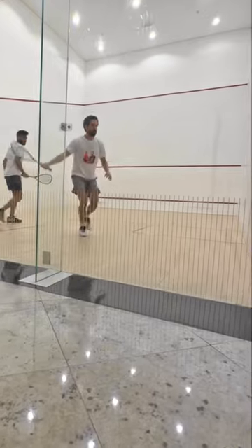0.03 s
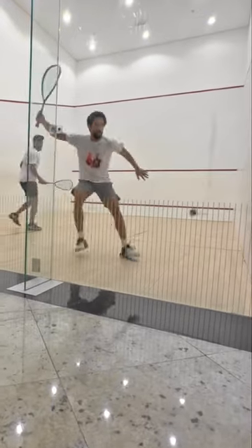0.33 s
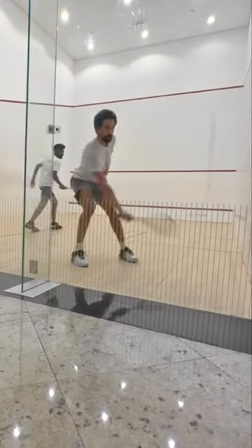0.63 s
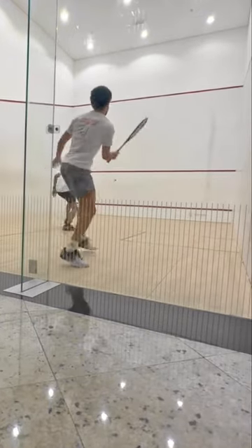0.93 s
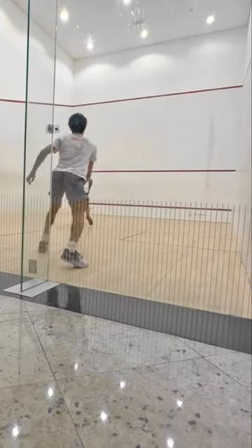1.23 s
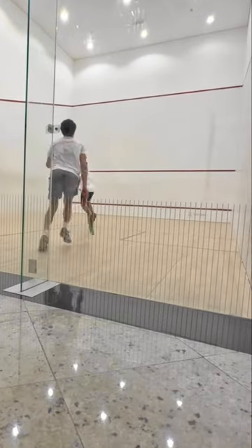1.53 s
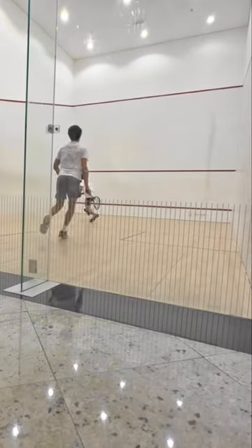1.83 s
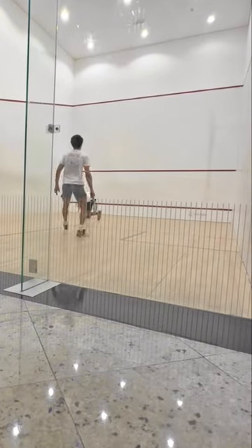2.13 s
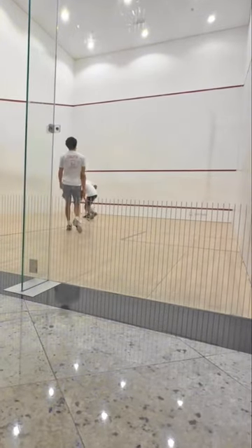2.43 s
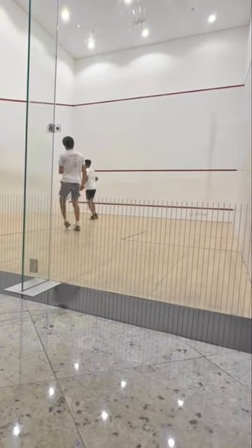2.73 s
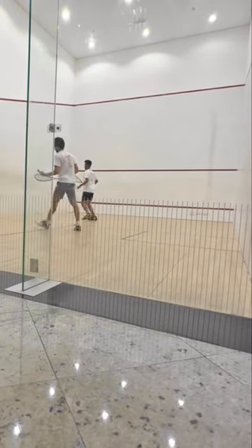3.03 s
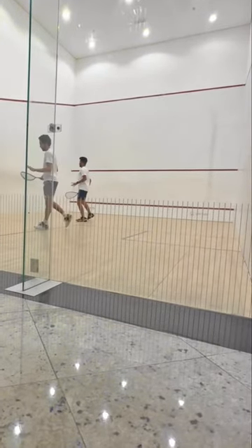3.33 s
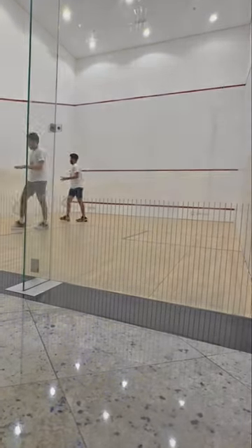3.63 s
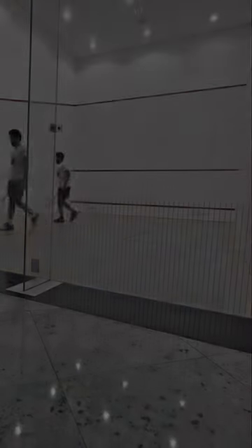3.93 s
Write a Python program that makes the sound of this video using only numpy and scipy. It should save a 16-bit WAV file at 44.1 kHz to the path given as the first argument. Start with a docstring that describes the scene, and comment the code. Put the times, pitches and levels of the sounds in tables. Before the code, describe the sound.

A squash ball cracks off rackets, walls and floor in an echoing court, in clusters at the start, around 0.7 seconds and from 1.6 to 2, with weaker hits near 3.3. Rubber soles squeak, loudest around 0.9 seconds and again near 2, 2.6 and 3. Feet thump on wooden boards throughout. Everything arrives mostly as long reverberation over a low ventilation rumble.

```python
"""Squash rally behind glass

A spaced microphone pair behind the glass back wall of a hard, very live court.
The ball cracks off rackets, walls and floor, rubber soles squeak and scuff, and feet thump the
sprung wooden boards. From here most of it arrives as the court's long ring, over ventilation rumble."""
import sys
import numpy as np
from scipy import signal
from scipy.fft import rfft, irfft, next_fast_len
from scipy.io import wavfile

SR = 44100
rng = np.random.default_rng(int(sys.argv[2]) if len(sys.argv) > 2 else 0)


def wrap_up_sound(samples):
    """Save the sound to the file named by the first command line argument, as 16-bit audio."""
    columns = np.atleast_2d(samples).T
    # keep every value between -1 and 1, then stretch to whole-number steps
    tamed = np.clip(columns, -1, 1)
    steps = np.round(tamed * 32767).astype(np.int16)
    wavfile.write(sys.argv[1], SR, steps)


N = 176400
LEAD_S = 1  # play starts before t = 0, so the court is already ringing
M = N + LEAD_S * SR


def ball(size=2048):
    """Each impact sends one sharp pulse into the court; on the direct path it rattles briefly."""
    # impacts: t/s, level/dB, body/dB, snap/dB, direct path/dB,
    # direct brightness (1 = near racket, below 0 = far and dull), struck spot's ring f/Hz, its lift/dB
    hits = [(-.55, -13.5, 1, 6, -20, .3, 830, 4), (.012, -27.5, -9.5, -1, -9, -0.38, 1230, 11),
            (.076, -24.5, 1.5, 9.5, -17.5, 0.29, 5170, 4.5), (.1, -20.5, -2, -11.5, -11, -0.31, 406, 2.6),
            (.165, -20.5, -2, -5, -12, -.3, 802, 11.3), (.6402, -22.5, -1, -1, -7.5, .7, 1830, 8),
            (.694, -26.5, -4, -8, -9, 0.095, 1400, 6.1), (.712, -24, -6, 2, -8, -0.54, 1850, 1.7),
            (.752, -26, -1, -5, -10, -0.2, 900, 6.1), (.815, -26, 4, -5.5, -10, -.4, 480, 8.3),
            (1.27, -36.5, -13, -13, -30, .3, 1400, 5.3), (1.606, -40.5, -4, 7, -13, 1.1, 2650, 3),
            (1.7568, -29.5, -3, -13, -12, -.3, 900, 5), (1.816, -27, 12, 3.5, -33, 0.78, 400, 2),
            (1.885, -24.5, 3.5, -4, -15.5, .2, 1450, 5), (2.0377, -23, -10.5, -1.5, -13, -.4, 1500, 4),
            (3.2787, -31, -1.5, 3, -11, 0.74, 1300, 1.4), (3.378, -37, 8, 9.5, -19, -0.29, 350, 5)]
    # spectrum of an impact: f/Hz, level/dB
    impact = [(60, 3), (170, -5), (320, -3), (520, 0), (820, -1), (1300, -0.5), (1900, -4.5), (2600, -9.5),
              (4000, -17.5), (6500, -10), (9500, -23.5), (14000, -34)]
    # extra treble on the direct path at brightness 1: f/Hz, gain/dB
    near_tilt = [(300, -10), (1000, 1), (2000, 3), (3500, 5.5), (8000, 9.5), (14000, 12)]
    # resonances of the struck walls: f/Hz, half width/Hz, lift/dB
    panels = [(760, 110, 0), (1208, 13, 4), (355, 55, 4)]
    body_hz, snap_hz, ring_width = 485, 2870, .098  # half width as a share of the ring's pitch
    rise_s, decay_s = .0012, .0052
    echo_s, echo_db = .018, -13  # first reflection from a nearby wall
    direct, room = np.zeros((2, M))
    hz, t = np.fft.rfftfreq(size, 1 / SR), np.arange(size) / SR
    walls = sum(lift_db / (1 + ((hz - centre) / width) ** 2) for centre, width, lift_db in panels)
    envelope = np.exp(-t / decay_s) * (1 - np.exp(-t / rise_s))
    for s, db, body_db, snap_db, direct_db, bright, ring_hz, ring_db in hits:
        body = body_db / (1 + (hz / body_hz) ** 4)
        snap = snap_db * (1 - 1 / (1 + (hz / snap_hz) ** 4))
        ring = ring_db / (1 + ((hz / ring_hz - 1) / ring_width) ** 2)
        spectrum = curve(hz, impact) + walls + body + snap + ring
        add(room, s, at_level(pulse(spectrum), db))
        rattle = rng.standard_normal(size) * envelope
        crack = signal.fftconvolve(pulse(spectrum + bright * curve(hz, near_tilt)), rattle)
        add(direct, s, at_level(crack, db + direct_db))
        add(direct, s + echo_s, at_level(crack, db + direct_db + echo_db))
    return np.array([direct, room])


def swing(start_s=.6, length_s=.039, pitch_hz=799.7, scatter=.07, db=-29.5):
    """The racket cuts the air before one stroke: a short, hollow whoosh that peaks late."""
    out, t = np.zeros(M), clock(length_s)
    hz = pitch_hz * (1 + scatter * wander(pitch_hz / 2, len(t)))
    eddies = np.sin(2 * np.pi * np.cumsum(hz) / SR)
    swell = np.sin(np.pi * (t / t[-1]) ** 2)
    add(out, start_s, at_level(eddies * swell, db))
    return np.array([out, out])


def squeaks(edge_s=.0068, direct_db=-9.5):
    """Rubber sticks and slips on the varnish: a rough, wobbling whistle with two overtones."""
    # sole squeaks: t/s, length/s, start f/Hz, end f/Hz, level/dB, 2nd and 3rd harmonic/dB, wobble/share
    slides = [(.2, .045, 3770, 3845, -30.5, 2, -35, 0.026), (.29, .045, 3824, 3860, -36, 4, -29, .02),
              (0.839, 0.0808, 3040, 2934, -22.5, 3, -11.5, 0.06),
              (.875, .1, 3430, 3580, -25.5, 4, -34, 0.033),
              (.912, 0.0603, 3068, 2897, -22, 10, -11.5, 0.0364),
              (.935, 0.03, 2858, 2836, -28.5, 1.5, -18, 0.0065),
              (.95, .04, 3500, 3510, -35.5, -1, -22, 0.011),
              (1.597, .071, 2556, 2700, -33.5, -5.5, -10.5, .05),
              (1.956, .037, 3700, 3780, -36.5, 1, -35, 0.04),
              (2.047, 0.078, 3745, 3847, -36.5, -5.5, -39.5, 0.0574),
              (2.08, .12, 2630, 2643, -34, -9, -10, 0.029),
              (2.595, .014, 5130, 5160, -23.5, -33, -29, .014),
              (2.618, .06, 5110, 5190, -26.3, -26, -50, .044),
              (2.63, 0.0862, 2687, 2860, -31, -1.5, -21, 0.02),
              (2.978, .035, 2775, 2800, -32, 5, -13, 0.028),
              (2.99, .09, 5130, 5180, -29.5, -32, -46, 0.026), (3.003, .05, 2814, 2834, -28, -1, -16, .03),
              (3.062, 0.0808, 2840, 2957, -31.5, 0.5, -12, .065)]
    wobble_hz, rasp = 653.2, .33
    jitter_hz, jitter, grit_hz, grit = 2978, .016, 1080, .11  # slip-to-slip scatter of period and size
    out = np.zeros(M)
    for s, length, start_hz, end_hz, db, second_db, third_db, wobble in slides:
        t = clock(length)
        waver = 1 + wobble * wander(wobble_hz, len(t)) + jitter * wander(jitter_hz, len(t))
        hz = np.linspace(start_hz, end_hz, len(t)) * waver
        phase = 2 * np.pi * np.cumsum(hz) / SR
        tone = np.sin(phase) + amp(second_db) * np.sin(2 * phase) + amp(third_db) * np.sin(3 * phase)
        fade = np.clip(np.minimum(t, t[-1] - t) / edge_s, 0, 1)
        grip = np.exp(rasp * wander(wobble_hz, len(t)))
        slip_size = 1 + grit * wander(grit_hz, len(t))
        add(out, s, at_level(tone * fade * grip * slip_size, db))
    return np.array([amp(direct_db) * out, out])


def steps(push_s=.015, room_db=-2):
    """Each foot's soft push sets the sprung boards booming."""
    # footfalls: t/s, level/dB, main pitch of the boards f/Hz, direct path/dB
    footfalls = [(-.3, -20.5, 86.2, -2), (0.0, -32.5, 102, -1), (0.14, -38, 72.2, -7),
                 (.39, -28.5, 112.3, -2.5), (.518, -28, 83.3, -5), (.659, -35, 96.5, -3),
                 (0.999, -36.5, 87.3, -2), (1.42, -32, 88.2, -4.5), (1.561, -30.5, 91, -4.5),
                 (1.68, -28.5, 73.7, -2), (1.966, -24.5, 83.4, -0.5), (1.992, -29, 87.5, -1),
                 (2.069, -26.5, 84.5, -3), (2.148, -37.5, 79, 0), (2.293, -32.5, 120.2, -0.5),
                 (2.36, -30, 107.1, -4), (2.954, -25, 101.4, 0.5), (2.998, -26, 102.9, 1.5),
                 (3.1, -36, 134.6, -5), (3.17, -40, 201.9, -2), (3.377, -45.5, 128.5, -2)]
    # floor modes: multiple of the main pitch, level/dB, t60/s
    boards = [(.6, -15.5, 0.47), (.83, -7, 0.058), (0.998, -2.5, 0.19), (1.222, -5, 0.22),
              (1.703, -13, 0.18), (2.8, -21, 0.095)]
    direct, room = np.zeros((2, M))
    t = clock(.5)
    push = 1 - np.exp(-(t / push_s) ** 2)
    for s, db, pitch_hz, direct_db in footfalls:
        boom = sum(amp(mode_db) * np.sin(2 * np.pi * pitch_hz * ratio * t) * decay(t, t60)
                   for ratio, mode_db, t60 in boards)
        thump = at_level(boom * push, db)
        add(direct, s, amp(direct_db) * thump)
        add(room, s, amp(room_db) * thump)
    return np.array([direct, room])


def scuffs(direct_db=-17):
    """A sole slides without gripping: a short hiss that dies as the foot stops."""
    # sliding soles: t/s, length/s, level/dB
    slides = [(0.214, .1, -35), (0.861, .08, -33.5), (1.831, 0.1, -42.5), (2.267, 0.015, -42.5),
              (2.976, 0.12, -33), (3.72, 0.098, -37.5)]
    # spectrum of the friction: f/Hz, level/dB
    friction = [(200, -1), (900, 4.5), (1600, 4.5), (2500, -10.5), (5000, 2), (8000, -1), (10000, -10.5),
                (14000, -20)]
    out = np.zeros(M)
    for s, length, db in slides:
        t = clock(length)
        hiss = colour(rng.standard_normal(SR), friction)[:len(t)]
        add(out, s, at_level(hiss * np.sqrt(1 - t / t[-1]), db))
    return np.array([amp(direct_db) * out, out])


def court(x, build_s=.0099, early_s=.1, early_db=-3, echoes_per_s=700):
    """Separate wall echoes thicken into a long ring whose treble dies first."""
    # reverberation time of the court: f/Hz, t60/s
    bands = [(40, 4.8), (100, 2.3), (250, 4.6), (500, 5.42), (1000, 4.55), (2000, 3.85), (3200, 3.15),
             (5000, 2.42), (7000, 1.78), (10000, 1.2), (16000, 0.42)]
    t, hz = np.arange(M) / SR, np.fft.rfftfreq(M, 1 / SR)
    dense = rng.standard_normal((2, M))
    echoes = rng.standard_normal((2, M)) * (rng.random((2, M)) < echoes_per_s / SR)
    early = amp(early_db) * np.sqrt(SR / echoes_per_s) * echoes * np.exp(-t / early_s)
    build = 1 - np.exp(-t / build_s)
    field = rfft(spaced_pair((dense + early) * build))
    centres, ring = np.array(bands)[:, 0], 0
    for share, (_, t60) in zip(np.eye(len(bands)), bands):
        band = irfft(field * curve(hz, np.c_[centres, share]), M)
        ring = ring + band * decay(t, t60)
    return signal.fftconvolve(x[None], ring * 2 / np.sqrt(SR), axes=1)[:, :M]


def ventilation(db=-37.5):
    """Room tone: the hall's steady low air noise, arriving from all round."""
    # spectrum of the moving air: f/Hz, level/dB
    rumble = [(20, -36.5), (55, 7), (120, -0.5), (250, -6), (800, -19.5), (2000, -23), (6000, -26),
              (14000, -64.5)]
    air = colour(spaced_pair(rng.standard_normal((2, M))), rumble)
    return air * amp(db) / air.std()


def spaced_pair(x, alike_hz=381):
    """Two unrelated signals become a diffuse field at two microphones, alike in the bass."""
    alike = np.sinc(np.fft.rfftfreq(x.shape[-1], 1 / SR) / alike_hz)
    mid, side = rfft(x) * np.sqrt([1 + alike, 1 - alike]) / np.sqrt(2)
    return irfft(np.array([mid + side, mid - side]), x.shape[-1])


def amp(db):
    """Decibels to gain."""
    return 10 ** (np.asarray(db) / 20)


def decay(t, t60):
    """A fall of 60 dB every t60 seconds."""
    return np.exp(-np.log(1000) * t / t60)


def curve(hz, points):
    """Read (f/Hz, value) points on a log-frequency axis."""
    p = np.array(points, float)
    return np.interp(np.log(hz + 1e-9), np.log(p[:, 0]), p[:, 1])


def colour(x, points):
    """Filter by a (f/Hz, gain/dB) curve."""
    n = next_fast_len(x.shape[-1])
    gain = amp(curve(np.fft.rfftfreq(n, 1 / SR), points))
    return irfft(rfft(x, n) * gain, n)[..., :x.shape[-1]]


def clock(length_s):
    """Sample times over a length."""
    return np.arange(max(int(length_s * SR), 8)) / SR


def at_level(x, db):
    """Scale a sound so that its energy, spread over a quarter second, has this level."""
    return x * amp(db) / np.sqrt(np.sum(x ** 2) * 4 / SR)


def add(track, s, x):
    """Mix a sound in at s seconds."""
    i = max(int((s + LEAD_S) * SR), 0)
    track[i:i + len(x)] += x[:len(track) - i]


def wander(rate_hz, size):
    """Smooth random motion, spread near 1."""
    return np.interp(np.arange(size) * rate_hz / SR, np.arange(1024), rng.standard_normal(1024))


def pulse(db):
    """The shortest causal pulse with this spectrum."""
    cepstrum = irfft(np.log(amp(db)))
    half = len(cepstrum) // 2
    cepstrum[1:half] *= 2
    cepstrum[half + 1:] = 0
    return irfft(np.exp(rfft(cepstrum)))


def scene(left_lead_s=.00052):
    """Ball and feet reach the left microphone first; the court's ring and room tone fill both."""
    direct, room = ball() + swing() + squeaks() + steps() + scuffs()
    direct_pair = np.array([direct, np.roll(direct, int(left_lead_s * SR))])
    return (direct_pair + court(room) + ventilation())[:, -N:]


def record(dry, top_hz=15800):
    """The left is a little brighter; the treble has a narrow gap and the top is cut steeply."""
    # overall tone colour, with a deep, narrow gap near 11 kHz: f/Hz, gain/dB
    tone_colour = [(20, -47), (50, -7), (125, 1.5), (1500, 0), (4000, 3.5), (4600, 0.5), (5130, 0),
                   (5450, -4), (6300, -2.5), (10100, 2), (11400, -35), (13000, 7), (15500, -2)]
    # the left side's own colour, mainly a presence lift: f/Hz, gain/dB
    left_lift = [(70, 0), (130, -2), (300, 2), (2500, 0), (3600, 2), (4500, 4.5), (5500, 6), (6400, 0)]
    heard = colour(np.array([colour(dry[0], left_lift), dry[1]]), tone_colour)
    return signal.sosfilt(signal.ellip(8, .2, 70, top_hz, fs=SR, output="sos"), heard)


dry = scene()
out = record(dry)
wrap_up_sound(out)
```